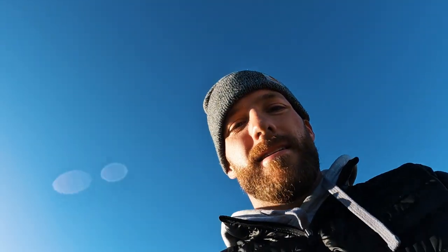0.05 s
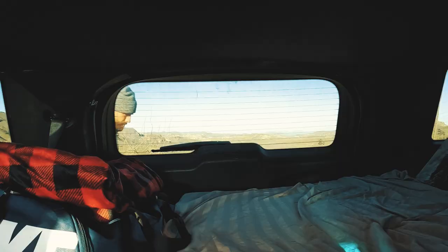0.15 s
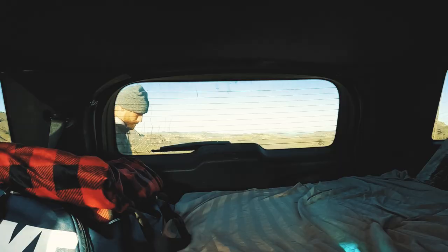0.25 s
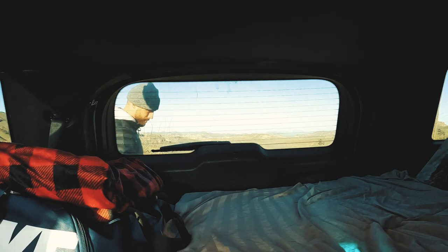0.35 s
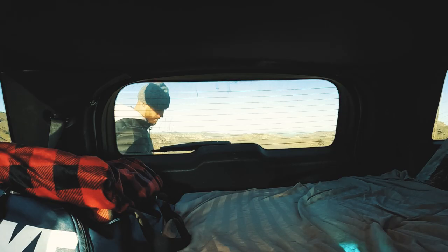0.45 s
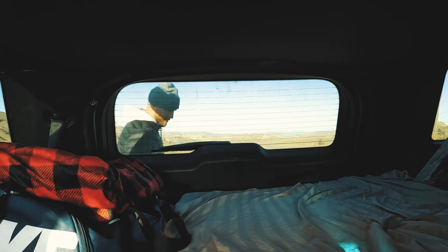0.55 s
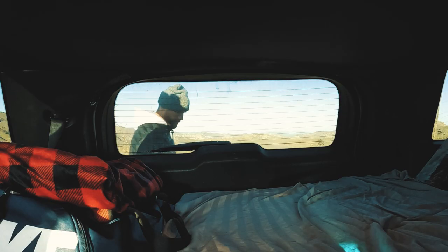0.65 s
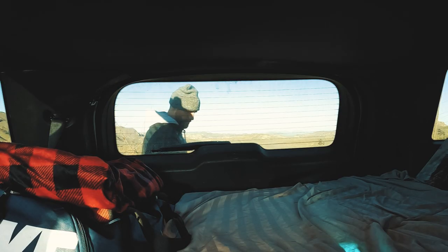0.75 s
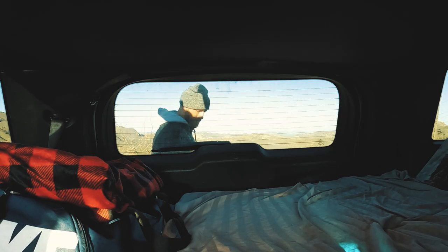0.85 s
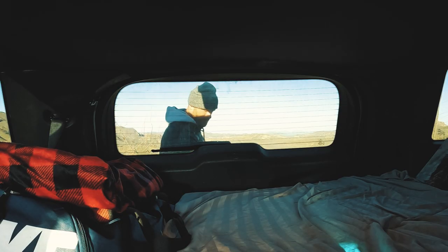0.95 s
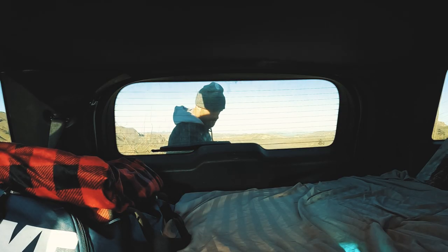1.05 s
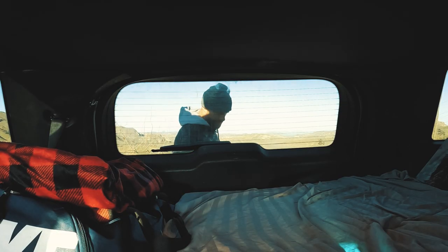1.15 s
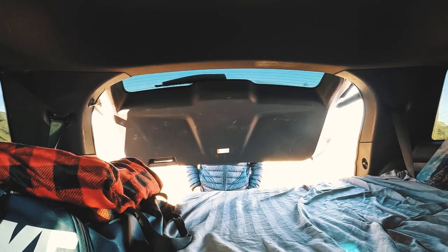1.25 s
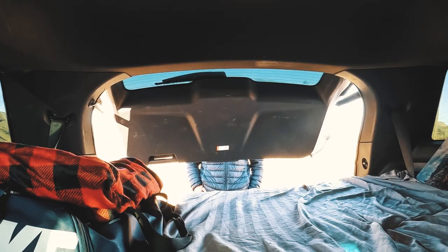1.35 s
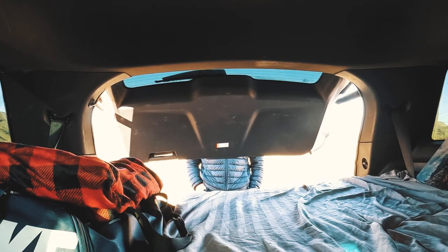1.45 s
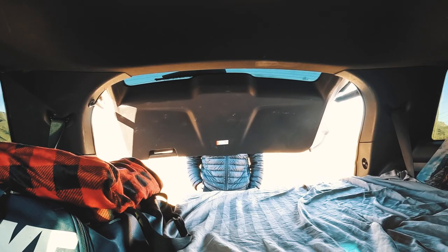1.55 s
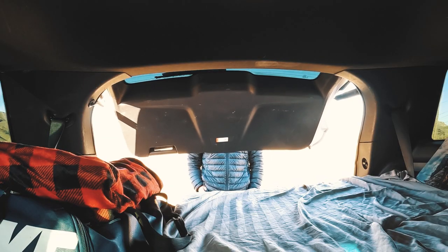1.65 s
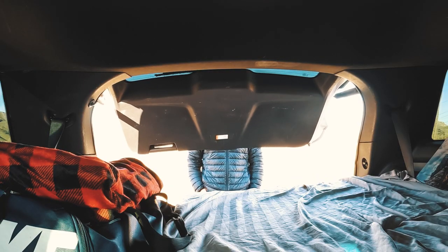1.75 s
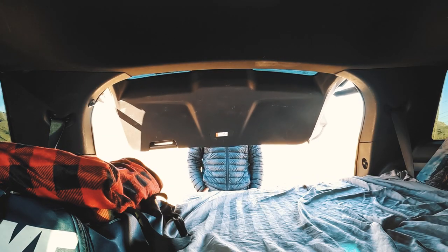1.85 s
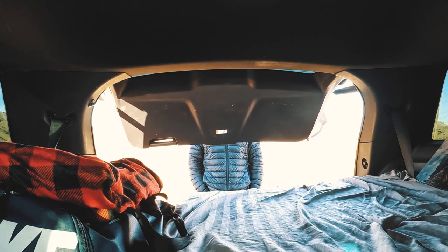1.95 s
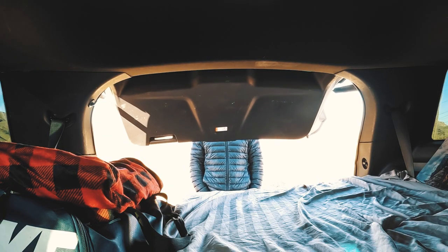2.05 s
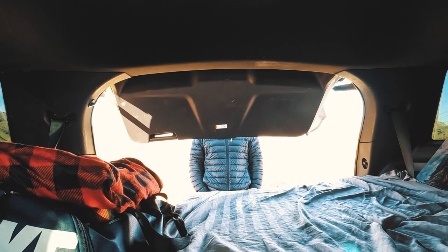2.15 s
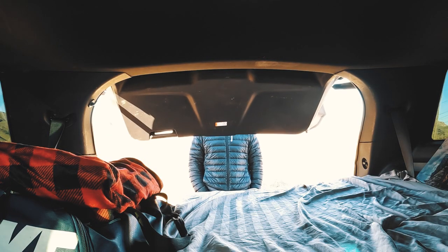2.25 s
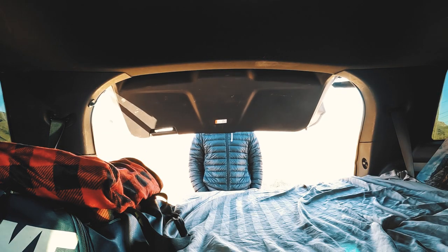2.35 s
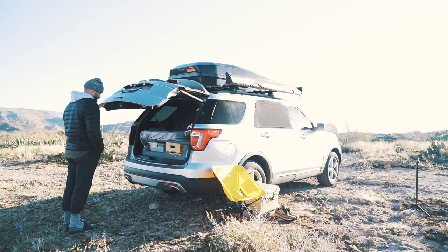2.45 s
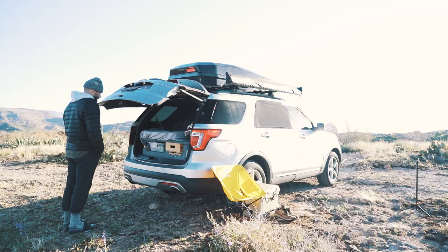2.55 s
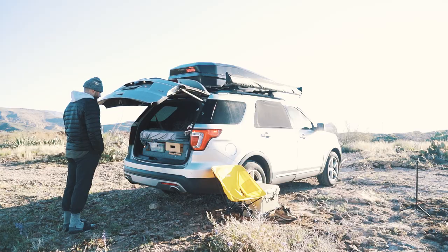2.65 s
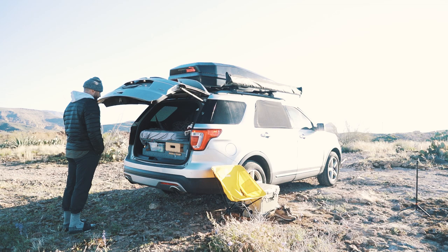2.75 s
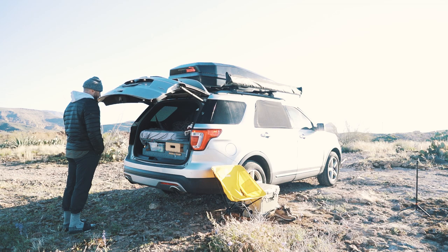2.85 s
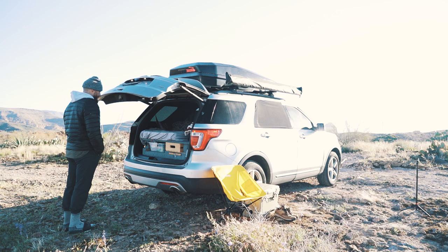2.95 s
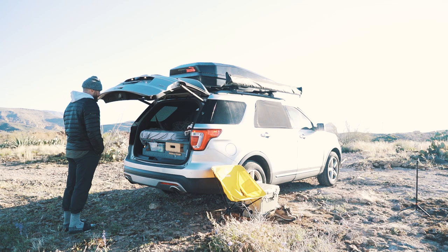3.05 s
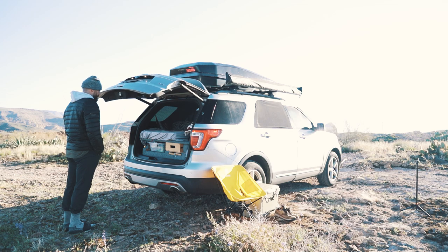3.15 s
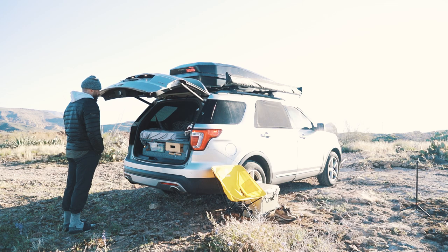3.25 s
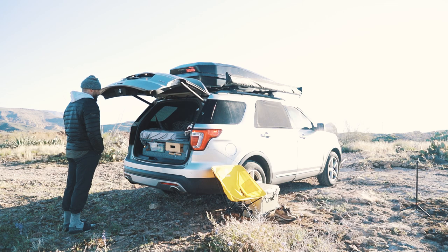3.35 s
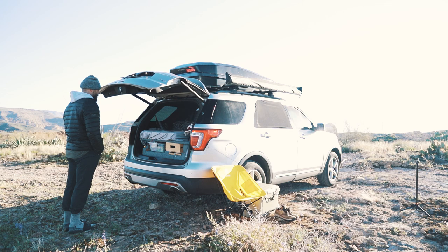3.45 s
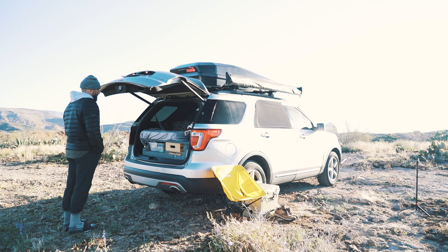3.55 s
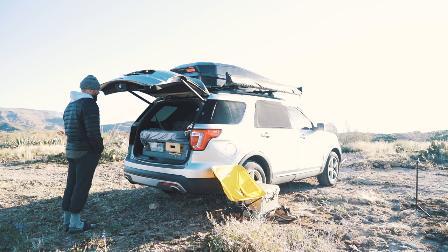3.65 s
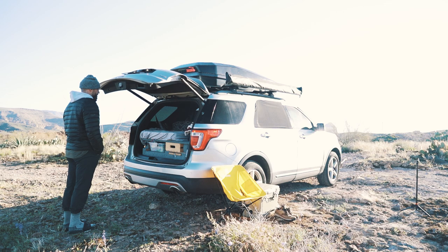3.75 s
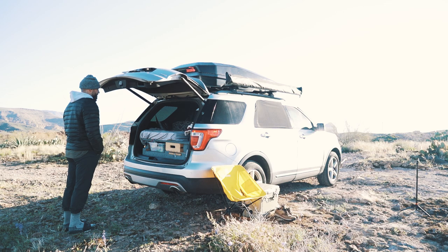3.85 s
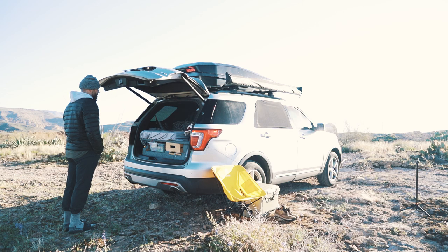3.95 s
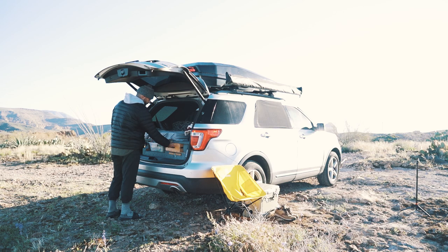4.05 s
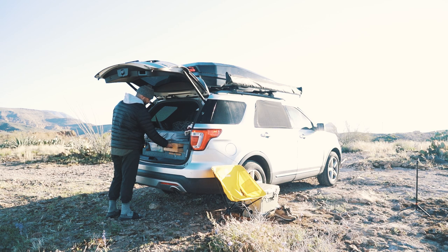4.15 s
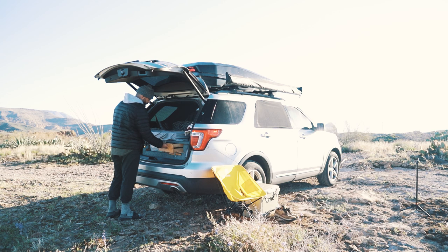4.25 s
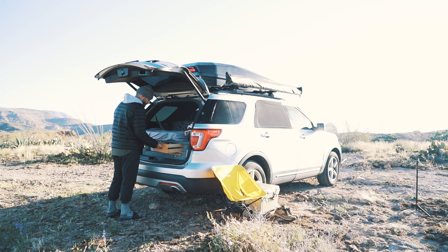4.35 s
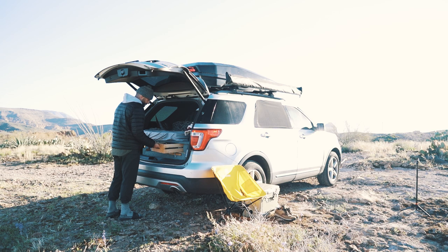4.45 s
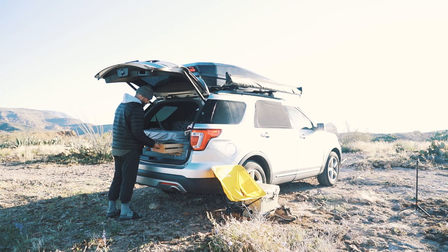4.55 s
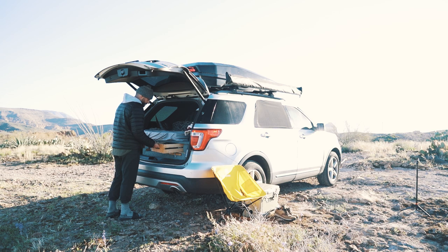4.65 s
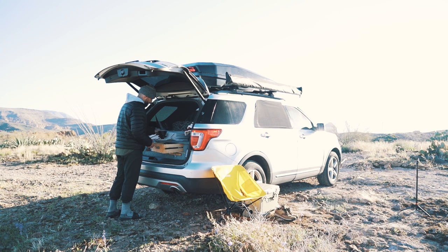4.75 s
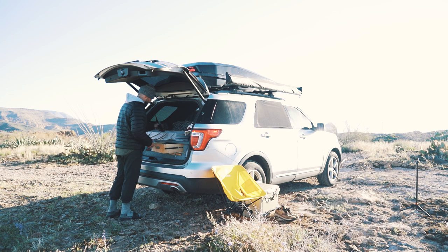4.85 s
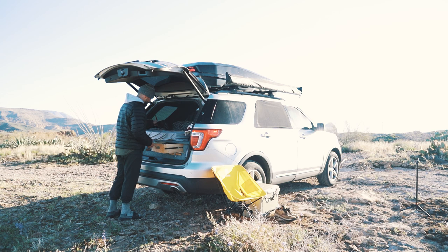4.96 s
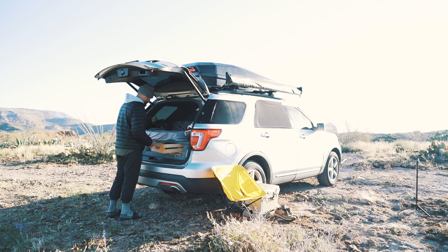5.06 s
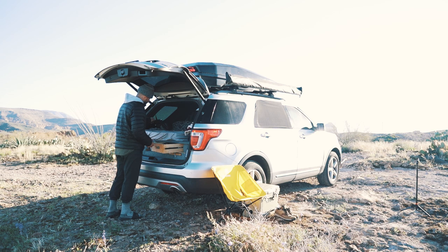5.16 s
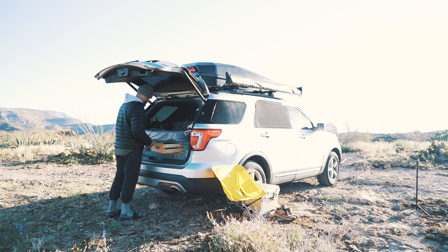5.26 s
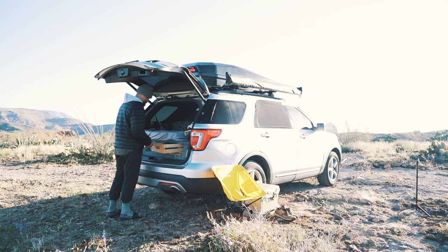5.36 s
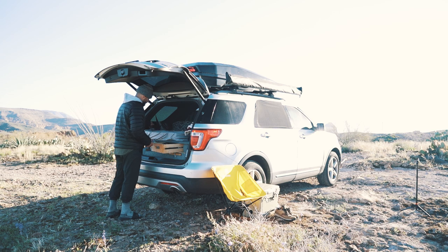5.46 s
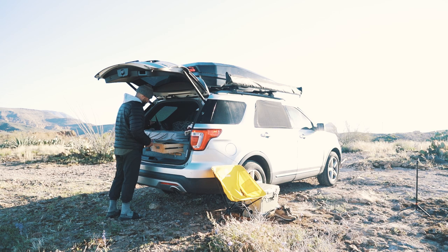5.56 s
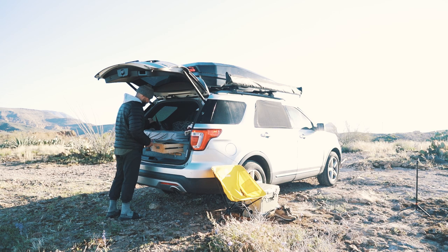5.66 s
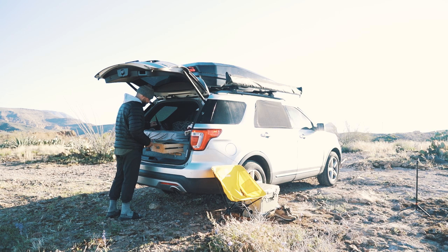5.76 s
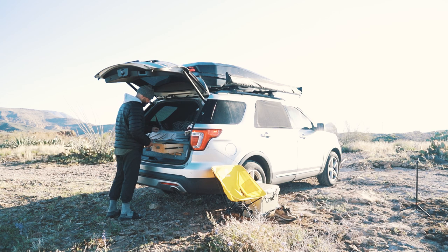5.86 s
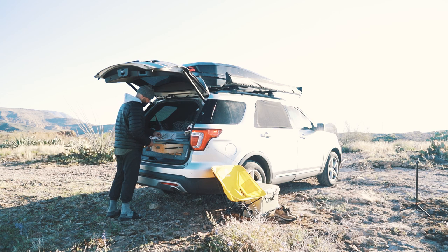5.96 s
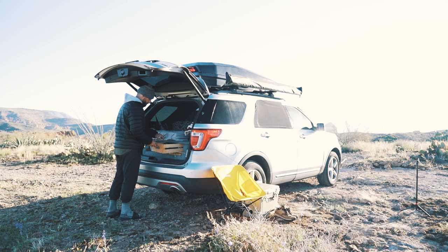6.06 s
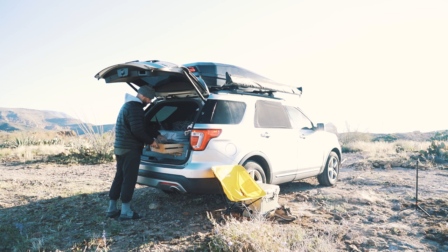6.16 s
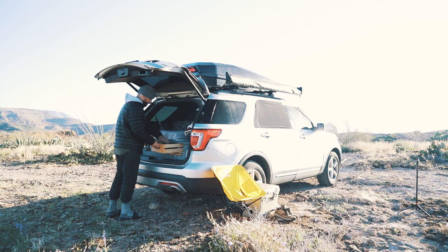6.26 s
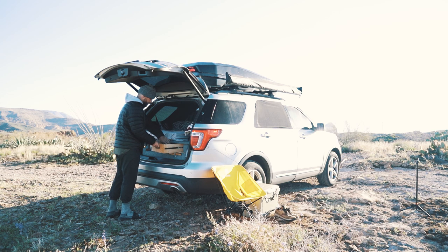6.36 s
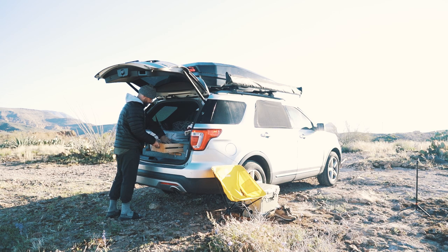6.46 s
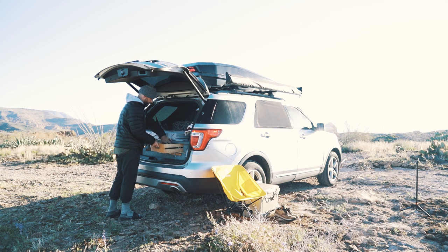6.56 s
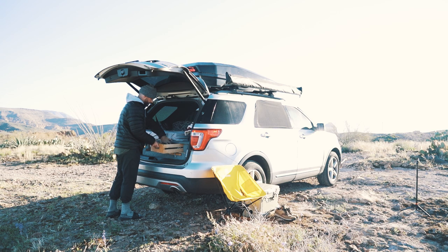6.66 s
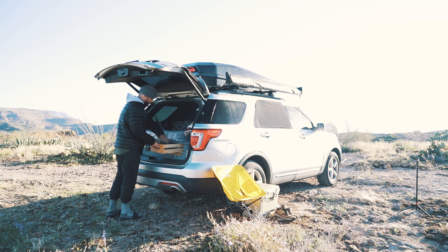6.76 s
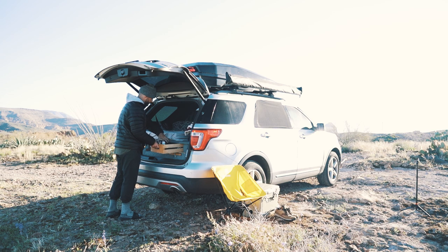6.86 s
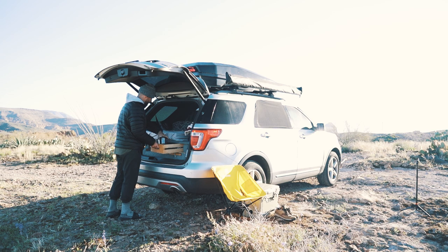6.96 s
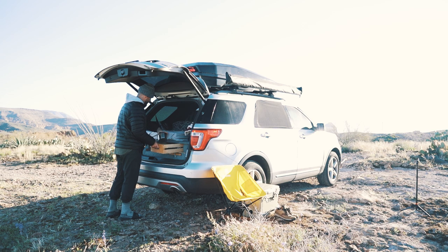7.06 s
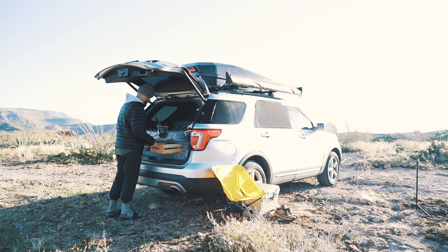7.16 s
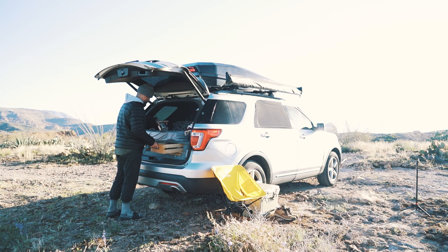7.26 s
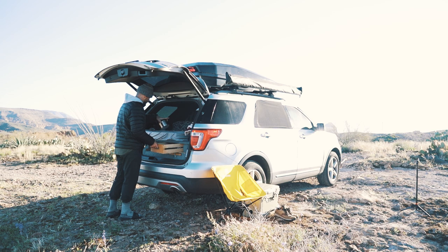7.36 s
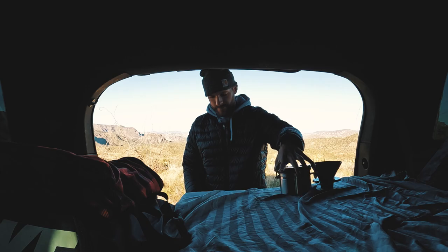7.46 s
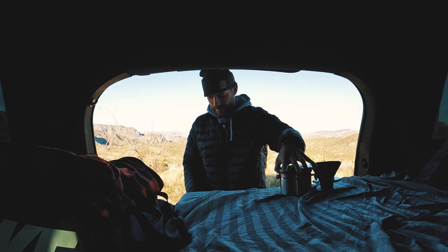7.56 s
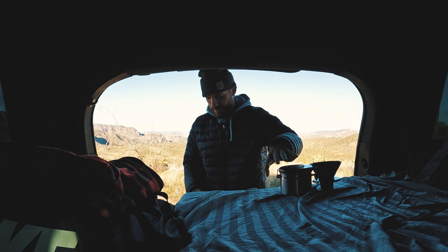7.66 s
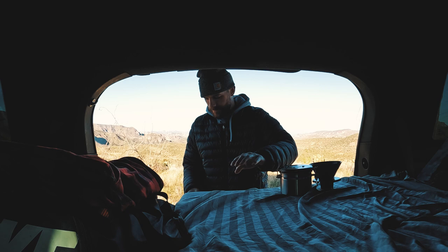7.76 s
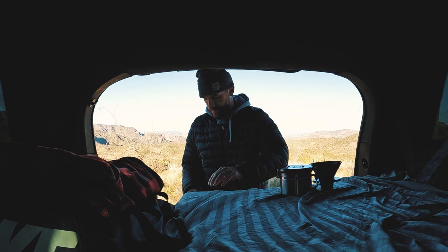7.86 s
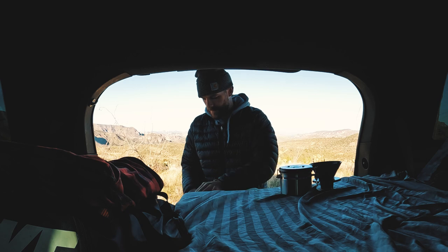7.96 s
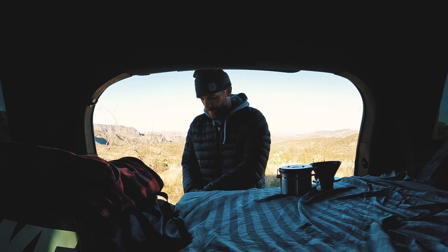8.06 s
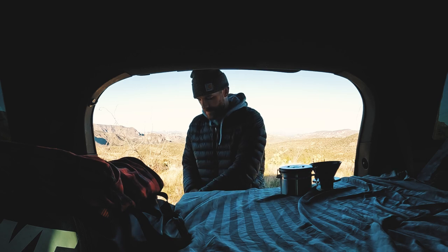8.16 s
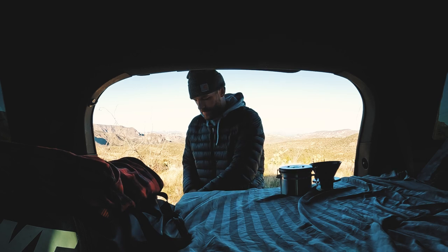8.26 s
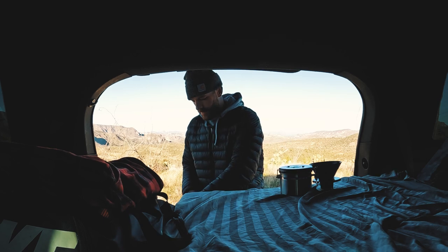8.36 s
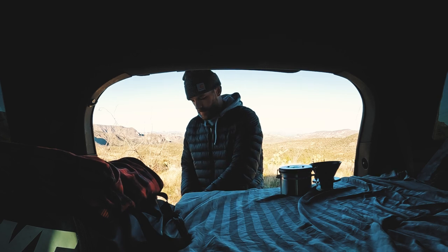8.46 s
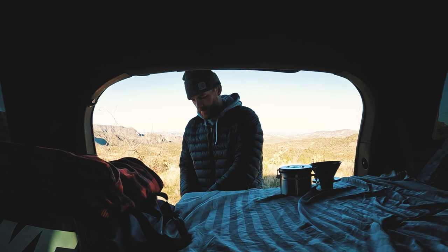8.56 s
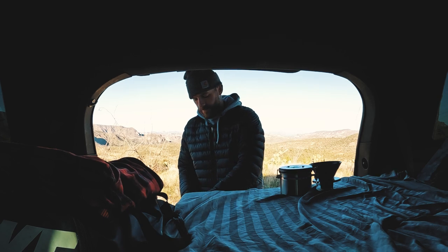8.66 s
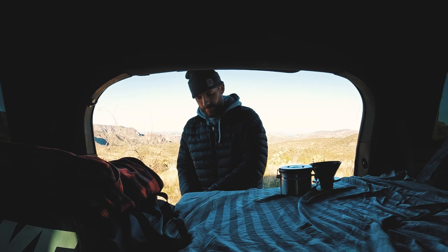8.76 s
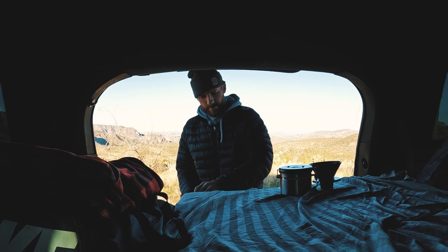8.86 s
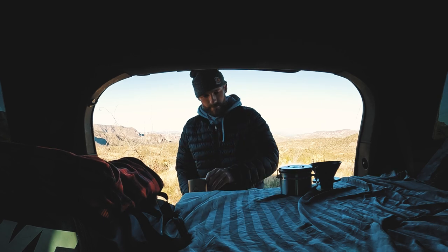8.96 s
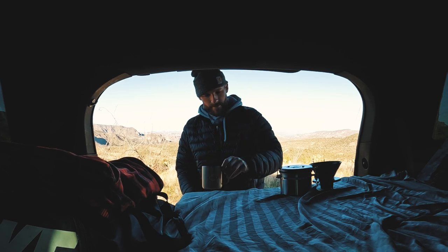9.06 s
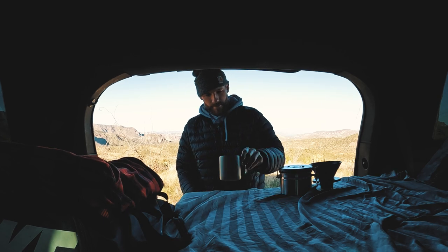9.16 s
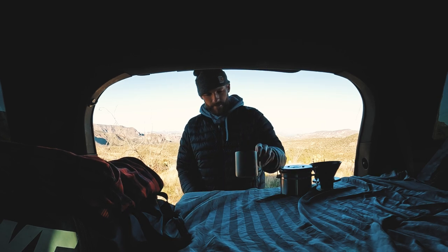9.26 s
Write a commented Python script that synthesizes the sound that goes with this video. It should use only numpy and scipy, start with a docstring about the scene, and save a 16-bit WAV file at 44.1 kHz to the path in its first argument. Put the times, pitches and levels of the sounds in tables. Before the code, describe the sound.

Car camp with abrupt changes of place: wind rumble, quiet closed cabin, electric tailgate droning from inside, then the same motor outdoors, brighter and less bassy, stopping before a wooden drawer rumbles out and bangs with ringing cookware. Quiet air and recorder hiss, then short wooden and metallic knocks as a pot is taken. Last, a close stereo cabin view: soft low thuds on the bed, a few dull mug clinks, near silence.

```python
"""A car camp in the morning, in five cuts: wind on a hand-held camera, the hush of the shut car, the tailgate motor
from inside and then outside, where a wooden drawer slides to its stop and a pot is lifted out, then the bed inside.
Air and rubbing are coloured noise, the motor a pulse train, struck gear decaying partials with a noisy crack.
The outside microphone is mono with opposite hiss in the two channels; the inside one is a close pair."""
import sys
import numpy as np
from scipy import signal
from scipy.fft import rfft, irfft, next_fast_len
from scipy.io import wavfile
from scipy.ndimage import uniform_filter1d

SR = 44100
rng = np.random.default_rng(int(sys.argv[2]) if len(sys.argv) > 2 else 0)


def transcribe(u):
    """Save the signal u as a 16-bit wav file named by the first command-line argument.

    u: samples, shape (n,) or (channels, n), limited to [-1, 1]; the rate is SR.
    q: integer samples, one column per channel.
    """
    v = np.clip(np.atleast_2d(u).T, -1, 1)
    q = np.round(v * 32767).astype(np.int16)
    wavfile.write(sys.argv[1], SR, q)


N = 410571


def undb(db):
    """Decibels to amplitude."""
    return 10 ** (np.asarray(db, float) / 20)


def unit(x):
    """Scales to rms 1."""
    return x / np.sqrt(np.mean(x ** 2) + 1e-30)


def curve(rows, column, beyond=-140):
    """A table column against time; outside the table it holds the value beyond."""
    rows = np.array(rows, float)
    return np.interp(np.arange(N) / SR, rows[:, 0], rows[:, column], beyond, beyond)


def gate(cut):
    """Opens and shuts with a short linear fade."""
    start_s, end_s, fade_s = cut
    s = np.arange(N) / SR
    return np.clip((s - start_s) / fade_s, 0, 1) * np.clip((end_s - s) / fade_s, 0, 1)


def walk(rate):
    """Random levels held 1 / rate s and slewed twice; spread near 1."""
    hold = int(SR / rate)
    steps = np.repeat(rng.standard_normal(N // hold + 1), hold)
    return 1.3 * uniform_filter1d(uniform_filter1d(steps, hold), hold)[:N]


def shape(x, points, peaks=()):
    """Filters by the points' gains, lifted at each resonance."""
    size = next_fast_len(len(x))
    hz = np.fft.rfftfreq(size, 1 / SR) + 1
    points_hz, points_db = np.transpose(points)
    db = np.interp(np.log(hz), np.log(points_hz), points_db, -120, -120)
    for centre_hz, width_hz, lift_db in peaks:
        db = db + lift_db / (1 + (2 * (hz - centre_hz) / width_hz) ** 2)
    return irfft(rfft(x, size) * undb(db), size)[:len(x)]


def colour(x, points, peaks=()):
    """Gives a flat sound the spectrum of the points; rms 1."""
    return unit(shape(x, points, peaks))


def pair(mid, other, wide):
    """Two microphones: a shared sound plus an unlike one with opposite signs."""
    return mid + shape(other, wide) * np.array([[1], [-1]])


def air(points, flicker_db, rate):
    """Noise whose bass, middle and treble each waver on their own."""
    white = rng.standard_normal(N)
    low, mid = uniform_filter1d(white, size=120), uniform_filter1d(white, size=12)
    bands = low, mid - low, white - mid
    return colour(sum(band * undb(flicker_db * walk(rate)) for band in bands), points)


def grit(rate, scatter_db, hiss):
    """Dense uneven clicks, each smeared over a few milliseconds, mixed with hiss."""
    clicks = np.zeros(N)
    at = rng.integers(0, N, int(rate * N / SR))
    clicks[at] = undb(scatter_db * np.minimum(rng.exponential(size=len(at)), 3.2))
    clicks = clicks * rng.standard_normal(N)
    tail = rng.standard_normal(512) * np.exp(-np.arange(512) / 90)
    tail = irfft(np.exp(1j * np.angle(rfft(tail))))  # same smear, no colour of its own
    return unit(signal.oaconvolve(clicks, tail)[:N]) + hiss * rng.standard_normal(N)


# Outside recorder's own hiss: freq_hz, relative level_db per Hz
PREAMP_COLOUR = [(12, -34), (20, 0.5), (431, -3), (1320, -14), (1950, -17), (2960, -16.5), (8310, -1.5),
                 (14500, -1.5), (15800, -5)]
PREAMP_RMS_DB = -78


def preamp_hiss():
    """Recorder noise, opposite in the two channels."""
    return colour(rng.standard_normal(N), PREAMP_COLOUR) * undb(PREAMP_RMS_DB) * np.array([[1], [-1]])


# Outside air around the car: freq_hz, relative level_db per Hz
FIELD_COLOUR = [(8.8, -30.5), (15, -0.5), (26, -4.5), (48, -26.5), (72, -9.5), (91, -3.5), (168, -23.5),
                (219, -19.5), (329, -23.5), (539, -24), (743, -29), (14500, -45), (15800, -43)]
FIELD_RMS_DB = -52.5


def field_air():
    """Steady outdoor noise, wavering slowly and slightly in three bands."""
    return air(FIELD_COLOUR, .8, 4.4) * undb(FIELD_RMS_DB)


# Wind on the hand-held camera: freq_hz, relative level_db per Hz
GUST_COLOUR = [(8.8, -36), (15, 4.5), (43, 1), (111, -16), (217, -17.5), (388, -30.5), (423, -33),
               (1140, -40), (3140, -44), (4990, -58), (12600, -75.5), (15500, -98)]
# Time of that cut: start_s, end_s, fade_s
GUST_CUT = (-1, 0.2, 0.033)
GUST_RMS_DB = -27


def gust():
    """Deep wind noise right at the microphone, with quick flicker."""
    return air(GUST_COLOUR, 1.6, 40) * undb(GUST_RMS_DB) * gate(GUST_CUT)


# Hush in the car, shut and open: freq_hz, relative level_db per Hz
SHUT_COLOUR = [(6, -40), (15, -14), (32, -15), (108, -32.5), (150, -22.5), (211, -19), (307, -23.5),
               (436, -33.5), (927, -36), (2210, -45), (7000, -47), (8500, -57), (15500, -73)]
OPEN_CAR_COLOUR = [(65, -50.5), (110, -6.5), (247, -11.5), (553, -23.5), (739, -25), (1690, -25),
                   (3280, -30), (3950, -32), (7060, -28), (9430, -46.5), (12100, -42.5), (15500, -65)]
# How far the inside microphones differ for the hush: freq_hz, side minus mid level_db
HUSH_WIDE = [(10, -27), (50, -14.5), (120, 1), (500, -1), (2000, -1.5), (5000, -6), (16000, -2.5)]
# Times of the shut car and of the bed: start_s, end_s, fade_s
SHUT_CUT = (0.19, 1.3, 0.01)
BED_CUT = (7.5, 11, 0.0074)
SHUT_MID_RMS_DB, OPEN_CAR_MID_RMS_DB = -73, -73.5


def car_hush():
    """Faint cabin noise; shared and side noises are independent, so it sounds wide."""
    shut = pair(air(SHUT_COLOUR, 1.0, 4.7), air(SHUT_COLOUR, 1.5, 4), HUSH_WIDE)
    opened = pair(air(OPEN_CAR_COLOUR, 0.89, 9.1), air(OPEN_CAR_COLOUR, 1.5, 6), HUSH_WIDE)
    return (shut * undb(SHUT_MID_RMS_DB) * gate(SHUT_CUT)
            + opened * undb(OPEN_CAR_MID_RMS_DB) * gate(BED_CUT))


# Wind moaning in a low and a higher gap on the right of the car: time_s, pitch_hz
MOAN = [(.2, 191), (.42, 150), (.49, 182.7), (.62, 159), (.72, 171.5), (.88, 115.2), (1.05, 163),
        (1.13, 147.2), (1.19, 176), (1.3, 148.6), (8.04, 164.6), (8.13, 125.7), (8.22, 166.1),
        (8.38, 139.4), (8.47, 161.6), (9.08, 125), (9.17, 164), (9.31, 155)]
MOAN_HIGH = [(.3, 215), (.63, 304), (.92, 320), (1.3, 288.6)]
MOAN_DB, MOAN_HIGH_DB = -70, -81  # before wavering and panning
MOAN_OPEN_DB = -3  # change of the low tone once the tailgate is open
MOAN_DIES_HZ, MOAN_DIES_DB_PER_HZ = 147.3, 1.5  # in a lull the low tone sinks and fades


def wavering_tone(hz, db):
    """A sine whose pitch and level wander."""
    phase = np.cumsum(hz * (1 + 0.0207 * walk(25))) / SR
    return np.sin(2 * np.pi * phase) * undb(db + 3.7 * walk(25))


def moan():
    """Wavering near-sine tones, much stronger on the right."""
    hz = curve(MOAN, 1, 150)
    low_db = MOAN_DB - MOAN_DIES_DB_PER_HZ * np.maximum(MOAN_DIES_HZ - hz, 0)
    low = wavering_tone(hz, low_db)
    high = wavering_tone(curve(MOAN_HIGH, 1, 215), MOAN_HIGH_DB)
    shut = (low + high) * gate(SHUT_CUT)
    opened = low * undb(MOAN_OPEN_DB) * gate(BED_CUT)
    return (shut + opened) * undb([[-6], [7]])  # left, right


STROKE_DB = 20  # a stroke rises and falls by this much in its rise and fall times


def strokes(at, rise, fall, peak_db):
    """Level in dB of swells that rise to a peak and fall again; their powers add."""
    at, rise, fall, peak_db = (np.reshape(v, (-1, 1)) for v in (at, rise, fall, peak_db))
    late = np.arange(N) / SR - at
    steps = np.maximum(-late / rise, late / fall)
    return 10 * np.log10(np.sum(undb(peak_db - STROKE_DB * steps) ** 2, axis=0) + 1e-30)


def stroked(table):
    """Body and treble level of a table of strokes."""
    at, rise, fall, body_db, treble_db = np.transpose(table)
    return strokes(at, rise, fall, body_db), strokes(at, rise, fall, treble_db)


# Jolts of the bed platform under the inside microphones: peak_s, deep_sway_db, thud_db
SWAY = [(7.5, -40.5, -55), (7.626, -21.5, -27), (7.76, -24.5, -49), (7.975, -37.5, -60.5),
        (8.07, -43, -58.5), (8.2, -41.5, -67.5), (8.47, -53.5, -56.5), (8.56, -47.5, -34),
        (8.64, -43.5, -41), (8.71, -41, -36.5), (8.8, -44, -37), (8.93, -41.5, -58.5), (9.15, -45.5, -66)]
SWAY_RISE_S, SWAY_FALL_S, THUD_RISE_S, THUD_FALL_S = .07, 0.23, .05, .13


def sway():
    """Each jolt shakes the microphones: a slow deep swell of noise and a shorter thud."""
    deep = colour(rng.standard_normal(N), [(8, -48), (16, 1), (26, -5.5), (42, -10.5), (55, -31.5)])
    thud = colour(rng.standard_normal(N), [(35, -16), (52, 7), (90, -3.0), (130, -10.0), (250, -28), (600, -46)])
    at, deep_db, thud_db = np.transpose(SWAY)
    return (deep * undb(strokes(at, SWAY_RISE_S, SWAY_FALL_S, deep_db))
            + thud * undb(strokes(at, THUD_RISE_S, THUD_FALL_S, thud_db)))


# Hinge ticks and cloth pats: start_s, peak_db, centre_hz, decay_s
TICKS = [(2.304, -46.5, 3020, 0.0026), (2.314, -49, 3080, 0.0026), (2.748, -38, 596, 0.008),
         (3.129, -47, 2500, 0.0098), (3.506, -40, 2380, 0.012), (4.896, -34, 1250, 0.0028),
         (7.335, -55, 3500, .0053), (7.61, -55.5, 4400, 0.0056), (7.615, -41.5, 673, 0.015),
         (7.621, -53, 2300, .012), (7.715, -53, 4650, 0.008), (8.065, -63, 2300, .004),
         (8.545, -35.5, 176, .02)]


def ticks():
    """Short dry noise bursts, about an octave and a half wide."""
    out, size = np.zeros(N), 2000
    u = np.arange(size) / SR
    for s, peak_db, hz, length in TICKS:
        burst = rng.standard_normal(size) * np.exp(-u / length) * np.minimum(u / (0.61 * length), 1)
        band = signal.butter(4, [hz / 1.65, hz * 1.65], "band", fs=SR, output="sos")
        burst = signal.sosfilt(band, burst)
        out[int(s * SR):int(s * SR) + size] += undb(peak_db) * burst / np.abs(burst).max()
    return out


# Small loose parts that ping: start_s, level_db, pitch_hz
PINGS = [(.118, -47.5, 3150), (4.52, -36, 3244), (6.806, -19, 3360), (7.084, -26.5, 2760),
         (8.415, -68.5, 5050), (8.79, -46.5, 1340), (9.17, -67, 3250)]
PING_T60_S = .055
# more of them at random while the drawer slides: time range, loudest level, pitch range
RATTLE_S, RATTLE_LOUDEST_DB, RATTLE_HZ = (4.2, 4.5), -40.5, (3000, 5100)


def pings(count=7):
    """One quickly fading partial each."""
    out, u = np.zeros(N), np.arange(6000) / SR
    when, softness, pitch = rng.random((count, 3)).T
    rattle_s, rattle_hz = np.interp(when, (0, 1), RATTLE_S), np.interp(pitch, (0, 1), RATTLE_HZ)
    rattle = zip(rattle_s, RATTLE_LOUDEST_DB - 6.0 * softness, rattle_hz)
    envelope = np.exp(-np.log(1000) * u / PING_T60_S) * np.minimum(u / .002, 1)
    for s, level_db, hz in PINGS + list(rattle):
        note = np.sin(2 * np.pi * hz * u) * envelope
        out[int(s * SR):int(s * SR) + len(u)] += undb(level_db) * note
    return out


# Hiss of the rising tailgate's seals and struts: time_s, level_db
STRUT_LEVEL = [(1.28, -83), (1.315, -69), (1.55, -66), (1.78, -61.5), (1.88, -69), (2.07, -59),
               (2.17, -62.5), (2.22, -76), (2.46, -71)]
# Its colour: freq_hz, relative level_db per Hz
STRUT_COLOUR = [(1060, -21), (1800, -5), (1960, -15), (2530, -1), (4350, -9), (5310, -7), (5850, -11),
                (6960, -5), (8220, -17), (9450, -21.5), (12100, -19), (12700, -22), (14500, -54)]


def strut():
    """Very dense grit in the upper middle and treble, following the level table."""
    return colour(grit(4000, 1.1, 0.88), STRUT_COLOUR) * undb(curve(STRUT_LEVEL, 1))


MOTOR_HZ = 123.4  # mean pulse rate


def motor(points, peaks, jitter, tone):
    """Uneven commutator pulses and gear noise through the car body."""
    phase = np.cumsum(MOTOR_HZ * (1 + jitter * walk(25)) / SR)
    pulses = (np.diff(np.floor(phase), prepend=0) > 0) * undb(1 * rng.standard_normal(N))
    gears = grit(900, 2.8, 1.36) * undb(1.6 * walk(15))
    return colour(tone * unit(pulses) + gears, points, peaks)


# Tailgate motor from inside: time_s, level_db
MOTOR_IN_LEVEL = [(1.28, -46), (1.36, -38.5), (2.46, -38.5)]
# Its colour: freq_hz, relative level_db per Hz
MOTOR_IN_COLOUR = [(8.8, -45.5), (15, -19), (48, 1.5), (81, -11.5), (118, 0), (165, -14.5), (251, -8),
                   (460, -22), (670, -25), (916, -35.5), (1100, -28.5), (1940, -43.5), (2200, -39.5),
                   (2860, -58), (4840, -120)]
# Its body resonances: centre_hz, width_hz, lift_db
MOTOR_IN_PEAKS = [(50.5, 24, 8.8), (122.6, 13.5, 4.5), (271, 18, 1.5), (682, 38, 10.4), (1080, 90, 3.6)]


def motor_inside():
    """The motor through the cabin: mostly low hum."""
    return motor(MOTOR_IN_COLOUR, MOTOR_IN_PEAKS, 0.013, 0.89) * undb(curve(MOTOR_IN_LEVEL, 1))


# Tailgate motor from outside: time_s, level_db
MOTOR_OUT_LEVEL = [(2.41, -46), (3.6, -46), (4.056, -43), (4.1, -62)]
# Its colour: freq_hz, relative level_db per Hz
MOTOR_OUT_COLOUR = [(110, -34), (180, -19), (234, -8), (280, -9), (364, -1), (574, -9), (736, -2),
                    (840, -8), (1190, -18), (2060, -26.5), (2720, -21), (4100, -35), (6000, -49.5),
                    (7800, -78), (13200, -120)]
# Its body resonances: centre_hz, width_hz, lift_db
MOTOR_OUT_PEAKS = [(244.3, 7.2, 7.2), (404, 86, 1.33), (647, 10, 1), (733, 23, 6.8), (2640, 240, 4)]


def motor_outside():
    """The same motor in the open: less bass, more middle."""
    return motor(MOTOR_OUT_COLOUR, MOTOR_OUT_PEAKS, .012, 0.63) * undb(curve(MOTOR_OUT_LEVEL, 1))


def rubbing(levels, points, metal, rate, lift_db, split_hz=2500):
    """Stick-slip grit that also shakes the metal; its body and its treble have their own level."""
    peaks = [(hz, 30 + .015 * hz, lift_db) for hz, _, _ in metal]
    x = colour(grit(rate, 3.0, 1.0) * undb(1.6 * walk(90) + 1.8 * walk(30)), points, peaks)
    body = signal.sosfilt(signal.butter(4, split_hz, fs=SR, output="sos"), x)
    treble = signal.sosfilt(signal.butter(4, split_hz, "high", fs=SR, output="sos"), x)
    return unit(body) * undb(levels[0]) + unit(treble) * undb(levels[1])


def ring(modes, hard_db, share, focus_hz, chance, scatter_db, size, focus_db=9):
    """Decaying partials; softness dulls them, the spot favours one pitch, a gripping hand shortens all."""
    s = np.arange(size) / SR
    hz, db, t60 = np.transpose(modes)[:, :, None]
    luck = chance[:len(modes), None]  # scatters level and starting phase
    spot_db = focus_db / (1 + (4 * np.log2(hz / focus_hz)) ** 2)
    gain = undb(db + scatter_db * luck + hard_db * np.log2(hz / 1000) + spot_db)
    decay = np.exp(-np.log(1000) * s / (t60 * max(share, .05)))
    return (gain * np.sin(2 * np.pi * hz * s + 20 * luck) * decay).sum(axis=0)


# Partials of the wood in every blow: pitch_hz, relative level_db, t60_s
WOOD = [(147, -19, .06), (215, -11, 0.061), (427, -24, 0.082), (495, 0, 0.053), (575, -6.5, 0.038),
        (662, 3, 0.037), (805, -6, .05), (1087, -18, 0.018), (1291, -7, 0.036), (1616, -4, 0.039),
        (2580, -10, 0.037), (3420, -5.5, .03)]
HARDER_PER_DB, FIRM_DB = 0.07, -20  # dB per octave of brightness gained per dB above a firm blow
SWARM_HZ, SWARM_DB, SWARM_T60_S = (901, 6206), -9.5, 0.087  # faint partials, drawn anew at each blow
BOUNCE_S, BOUNCE_DB = .019, -1.5  # a blow this soon after another is a bounce, duller by this per octave


def blows(table, metal, points, chatter, rise, crack_db, firm_hard_db):
    """Each blow lands over a few milliseconds: wood chatters, metal rings, and a noisy crack joins them."""
    out, size, last = np.zeros(N + SR), 4096, 0
    u = np.arange(3 * size) / SR
    land = 1 - np.exp(-(u / rise) ** 2)
    fall = np.exp(-u[:size] / max(chatter, .0005))
    for s, wood_db, metal_db, share, focus_hz in table:
        noise, chance = rng.standard_normal((2, size))
        louder_db = max(wood_db, metal_db)
        hard_db = firm_hard_db + HARDER_PER_DB * (louder_db - FIRM_DB) + BOUNCE_DB * (s - last < BOUNCE_S)
        last = s
        push = fall * noise * (chance > 1.8)  # little bounces
        push[0] = 2
        wood = ring(WOOD, hard_db, 0.99, focus_hz, chance, 1.1, size=size, focus_db=4.0)
        wood = signal.fftconvolve(wood, push)[:size] * land[:size]
        bell = ring(metal, hard_db, share, focus_hz, noise, 1.5, size=len(u)) * land
        swarm_hz = np.exp(np.interp(rng.random(size=24), (0, 1), np.log(SWARM_HZ)))
        swarm = [(hz, 0, SWARM_T60_S) for hz in swarm_hz]
        faint = ring(swarm, hard_db - 2.0, share, focus_hz, chance, 5.1, size=len(u)) * land
        bell = bell / np.abs(bell).max() + undb(SWARM_DB) * faint / np.abs(faint).max()
        # loose pieces touch the ringing metal, so its level flutters
        bell = bell * undb(2.4 * np.interp(u, np.arange(100) * .004, chance[-100:]))
        tilt = [(100, -13.5), (350, -hard_db), (1000, 9.5), (16000, 4 * hard_db)]
        crack = shape(colour(noise, points), tilt, [(focus_hz, 0.12 * focus_hz, 8)])
        crack = fall * land[:size] * crack
        i = int(s * SR)
        for part, db in ((wood, wood_db), (bell, metal_db), (crack, louder_db + crack_db)):
            out[i:i + len(part)] += undb(db) * part / np.abs(part).max()
    return out[:N]


# Strokes of hands over the gear on the bed: peak_s, rise_s, fall_s, body_db, treble_db
FUMBLE = [(7.662, 0.18, .21, -67.5, -76), (8.482, 0.14, .3, -67.5, -79), (8.58, 0.09, 0.11, -59, -61.5),
          (8.68, 0.12, 0.12, -47, -61)]
# Colour of touches on the bed: freq_hz, relative level_db per Hz
FUMBLE_COLOUR = [(150, -11.5), (250, -14), (767, -27), (1700, -28.5), (2200, -35.5), (3850, -33.5),
                 (4200, -30), (5320, -26.5), (6750, -28), (9810, -47), (12000, -35), (14500, -77)]
# Partials of the dripper: pitch_hz, relative level_db, t60_s
DRIPPER = [(537, 4, 0.072), (827, -6, 0.066), (1298, -18.5, 0.17), (1714, -14, 0.17), (1946, -14, 0.11),
           (2885, -10.5, 0.13), (3150, -31.5, .2), (3830, -22.5, .13), (4204, -6.5, .12),
           (4480, -23.5, .14), (5100, -29, .2), (5450, -10, 0.091), (7100, -15, 0.16)]


def fumbling():
    """Hands rub the gear on the bed; the grit excites the dripper's resonances."""
    return rubbing(stroked(FUMBLE), FUMBLE_COLOUR, DRIPPER, 1500, 5.7)


# Partials of a mug: pitch_hz, relative level_db, t60_s
MUG = [(523, 0.5, 0.082), (754, -31.5, 0.081), (1244, -0.5, 0.044), (1480, -10, 0.12), (1690, -30, 0.074),
       (2160, -19.5, 0.12), (2673, -17.5, 0.072), (3140, -28.5, 0.1), (3680, -17.5, .12), (4344, -8, 0.055),
       (4716, -25.5, 0.187), (5750, -20.5, 0.12), (7115, -5, 0.045), (8700, -26.5, 0.0494),
       (12000, -36.5, .03)]
# Blows on the mugs and the dripper: start_s, wood_peak_db, metal_peak_db, share of free ring time, favoured_hz
MUG_BLOWS = [(8.543, -41.5, -46.5, .5, 1020), (8.63, -32, -17.5, .9, 7500), (8.667, -40, -20, 1, 1560)]
DRIPPER_BLOWS = [(8.416, -75, -62, 0.97, 1260), (8.441, -71, -54, .9, 1400), (8.58, -64, -45, 0.4, 1750),
                 (8.718, -50.5, -28.5, 0.99, 1210), (8.738, -55, -35.5, .57, 2890),
                 (8.772, -65, -48.5, .67, 1287), (9.17, -81, -67, .9, 1740)]


def mugs():
    """Mugs and the dripper knock close to the inside pair."""
    mug = blows(MUG_BLOWS, MUG, FUMBLE_COLOUR, 0.0098, 0.0032, crack_db=-9.5, firm_hard_db=0.16)
    dripper = blows(DRIPPER_BLOWS, DRIPPER, FUMBLE_COLOUR, .013, .004, crack_db=-9, firm_hard_db=-0.9)
    return mug + dripper


# Strokes of hands over the gear in the drawer: peak_s, rise_s, fall_s, body_db, treble_db
RUMMAGE = [(6.22, .9, 2.5, -65, -66.5), (6.572, 0.13, 0.21, -49, -54.5), (6.904, 0.22, 0.12, -46.5, -63),
           (7.148, 0.1191, 0.11, -45, -73), (7.3, .9, 1.5, -70, -70)]
# Colour of the drawer and touches in it: freq_hz, relative level_db per Hz
SLIDE_COLOUR = [(71, -41), (120, -12.5), (208, -9), (326, -7), (681, -2), (983, -11), (1260, -10.5),
                (1450, -9.5), (1780, -15), (1930, -13), (3490, -19.5), (5690, -23.5), (6700, -32.5),
                (8740, -26.5), (15800, -47.5)]
# Partials of the drawer's gear and the pot: pitch_hz, relative level_db, t60_s
GEAR = [(1270, -24.5, 0.45), (1397, -8.5, .095), (1698, -18, 0.096), (1836, -12, .2), (2130, -5.5, 0.032),
        (2435, -5.5, 0.1), (2606, -12, 0.26), (2976, -10, 0.11), (3170, -4.5, 0.067), (3160, -11, .06),
        (3570, -8.5, 0.14), (5530, -16, .07), (6002, -27, .085), (7660, -24, 0.0613), (8410, -23, 0.0695)]


def rummaging():
    """Hands rub through the drawer; the grit excites the gear's resonances."""
    return rubbing(stroked(RUMMAGE), SLIDE_COLOUR, GEAR, 1500, 2.6)


# Knocks on the wooden drawer and its gear, then on the pot as it is lifted out:
# start_s, wood_peak_db, metal_peak_db, share of free ring time, favoured_hz
GEAR_BLOWS = [(6.119, -44.5, -58, .45, 1470), (6.402, -46.5, -47, .38, 1330), (6.705, -44, -51, .41, 1440),
              (6.761, -41, -46, .49, 2280), (6.786, -30.5, -37.5, .5, 1174),
              (6.806, -22.5, -17.5, 0.413, 1600), (6.822, -23, -21, .51, 1450),
              (6.844, -28.5, -25, 0.62, 1250), (6.86, -23, -24, 0.89, 910), (6.893, -17.5, -37.5, 0.4, 640),
              (6.905, -26, -45, .45, 1110), (6.971, -40.5, -44, .45, 2660), (7.083, -21.5, -21, 0.15, 942),
              (7.101, -30.5, -30.5, 1, 1430), (7.134, -30, -38, .51, 750), (7.146, -23, -21, 0.66, 1470),
              (7.169, -31.5, -32, .97, 2570)]


def gear_knocks():
    """Knocks on the wooden drawer and its gear, then on the pot as it is lifted out; most ring short."""
    return blows(GEAR_BLOWS, GEAR, SLIDE_COLOUR, 0.0092, .0015, crack_db=-1.0, firm_hard_db=-0.5)


# The drawer slides out: time_s, body_db, treble_db
SLIDE = [(4.06, -67, -73), (4.226, -43.5, -46.5), (4.42, -48, -44), (4.626, -46, -55), (4.82, -53, -61)]
# Partials of the cookware: pitch_hz, relative level_db, t60_s
COOKWARE = [(404, -15, 0.36), (448, -15, 0.27), (555, -12.5, .3), (1084, -20, 0.51), (1243, -6.5, 0.28),
            (1308, 0.5, .13), (1420, -17, 0.23), (1730, -14.5, 0.51), (1819, -6.5, .4), (1888, -12, 0.47),
            (2275, -28, 0.27), (2360, -12.5, 0.14), (2550, -17.5, .25), (2660, -22, .2),
            (2930, -20.5, 0.19), (3136, -19, .22), (3570, -19, .17), (4150, -25.5, 0.66), (4730, -23, .11),
            (5071, -27, 0.36), (5300, -23, .23), (6040, -27.5, 0.21), (7300, -35.5, .25),
            (8183, -35.5, .27), (8619, -30, 0.17)]
# Blows in the drawer: start_s, wood_peak_db, metal_peak_db, share of free ring time, favoured_hz
DRAWER_BLOWS = [(4.206, -28.5, -49, 1, 660), (4.222, -30, -41, 0.88, 669), (4.249, -28, -40, 1, 695),
                (4.287, -29, -26.5, .75, 714), (4.302, -35, -32, .5, 1820), (4.369, -38.5, -38, 1, 1272),
                (4.397, -40, -39, .85, 1250), (4.474, -28.5, -32, 1, 680), (4.505, -19.5, -23.5, 0.76, 660),
                (4.548, -11.5, -13.5, 0.94, 640), (4.598, -21.5, -15, .88, 675),
                (4.611, -23, -28, 0.68, 1256), (4.64, -34, -21, 0.96, 1870)]
# Time the sliding drawer is heard: start_s, end_s, fade_s
DRAWER_CUT = (4.07, 4.8, 0.02)


def drawer():
    """Wood rubs along to its stop while the cookware clanks."""
    clanks = blows(DRAWER_BLOWS, COOKWARE, SLIDE_COLOUR, 0.011, .003, crack_db=-2.0, firm_hard_db=0.3)
    slide = rubbing((curve(SLIDE, 1), curve(SLIDE, 2)), SLIDE_COLOUR, COOKWARE, 1200, 4.1)
    return (clanks + slide) * gate(DRAWER_CUT)


# How far the inside microphones differ for near sounds: freq_hz, side minus mid level_db
NEAR_WIDE = [(10, -17), (100, -22.5), (220, -19.5), (500, -11.5), (1100, -10), (4000, -6), (8000, -7),
             (16000, -3)]
# Time of the opening tailgate heard from inside: start_s, end_s, fade_s
OPENING_CUT = (1.287, 2.45, 0.016)


def inside():
    """The pair in the car: bass and near knocks are mostly shared, hush and treble less so."""
    opening = gate(OPENING_CUT) * (motor_inside() + strut())
    near = opening + gate(BED_CUT) * (fumbling() + mugs() + sway())
    # the left microphone faces the tailgate and gets more treble
    lean = 0.19 * signal.sosfilt(signal.butter(2, 5000, "high", fs=SR, output="sos"), near)
    # spaced microphones differ in phase: the side is the sound a quarter cycle later
    turned = signal.hilbert(near, next_fast_len(N)).imag[:N]
    return car_hush() + moan() + pair(near, turned, NEAR_WIDE) + lean * np.array([[1], [-1]])


# Time of the outdoor cut: start_s, end_s, fade_s
FIELD_CUT = (2.42, 7.505, 0.02)


def outside():
    """The mono microphone's wind, air, motor and drawer, and the hiss of its recorder."""
    background = field_air() + preamp_hiss()
    near = motor_outside() + rummaging() + gear_knocks() + drawer()
    return gust() + gate(FIELD_CUT) * (background + near)


def scene():
    """Outside and inside microphones, with ticks and pings equal in both channels."""
    return outside() + inside() + ticks() + pings()


def record(dry):
    """The recorder cuts the top steeply above 15750 Hz."""
    return signal.sosfilt(signal.ellip(10, .2, 80, 15750, fs=SR, output="sos"), dry)


dry = scene()
out = record(dry)
transcribe(out)
```